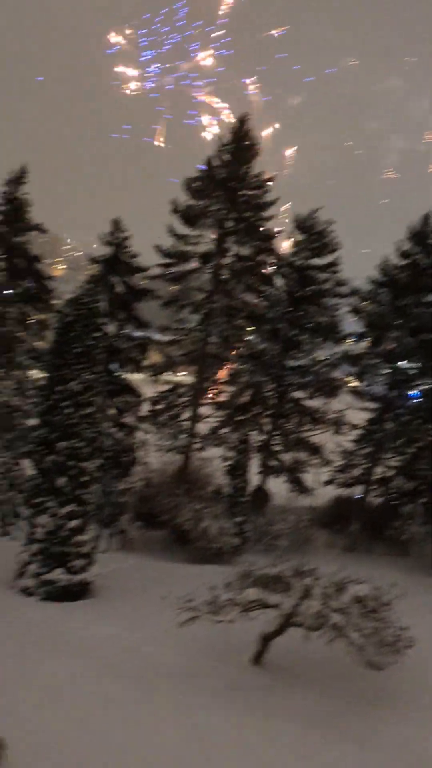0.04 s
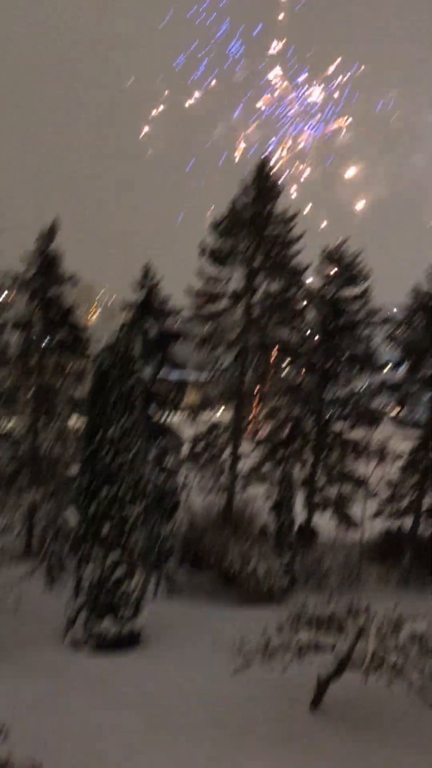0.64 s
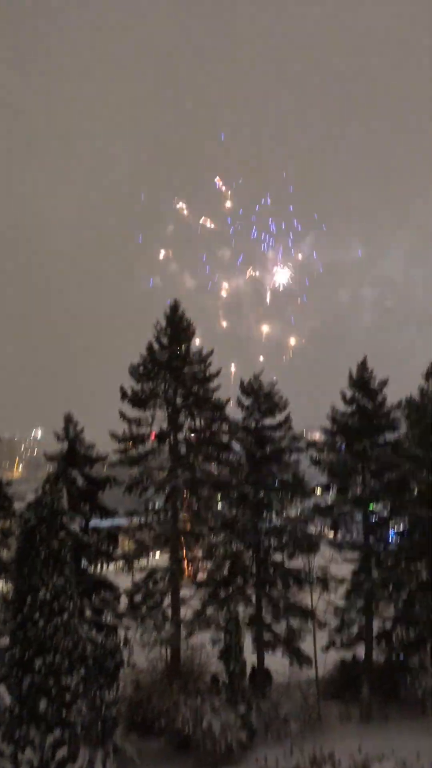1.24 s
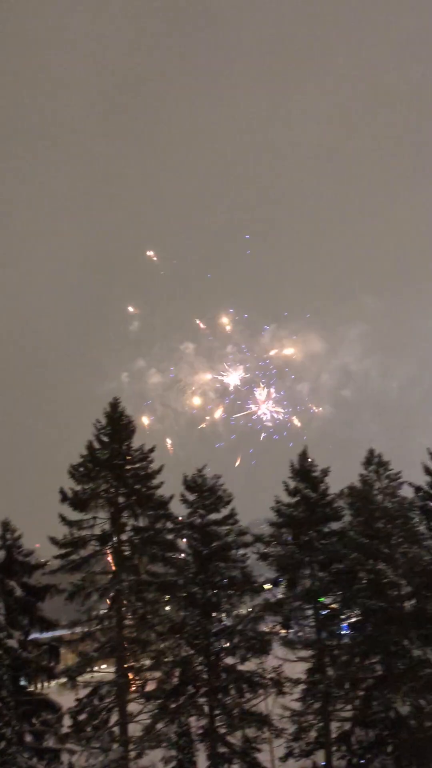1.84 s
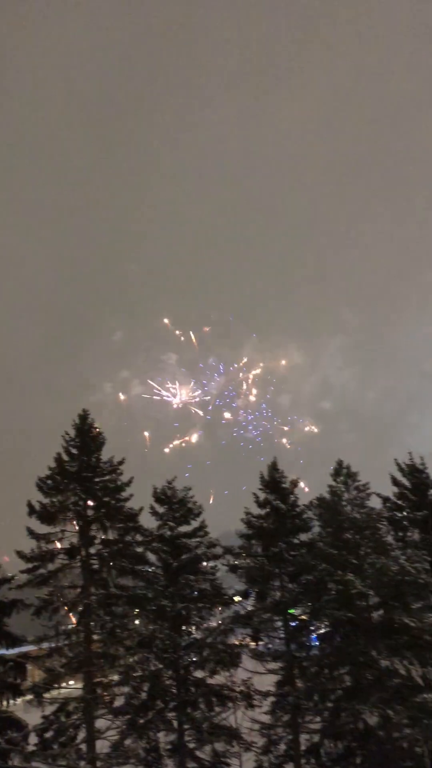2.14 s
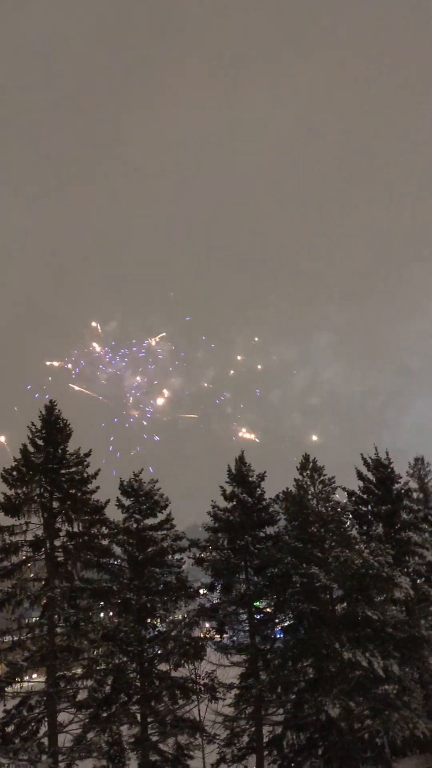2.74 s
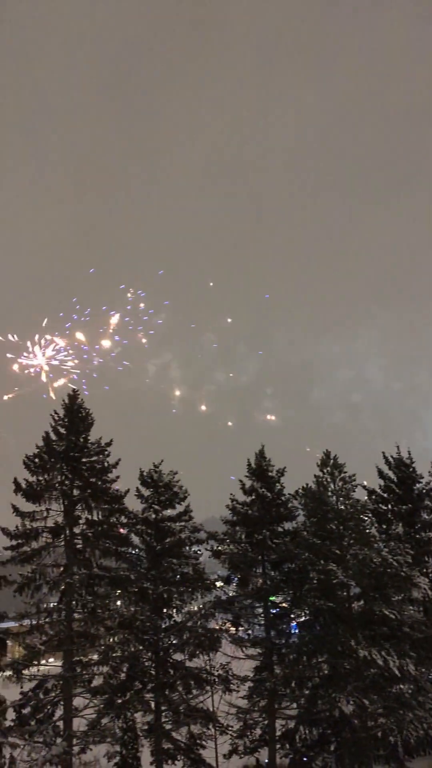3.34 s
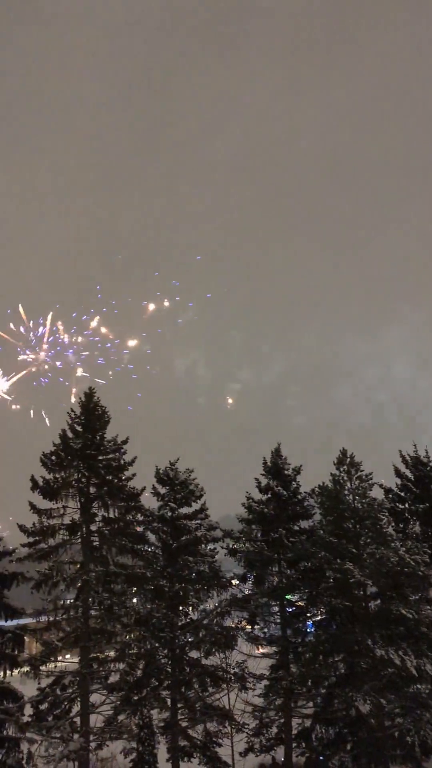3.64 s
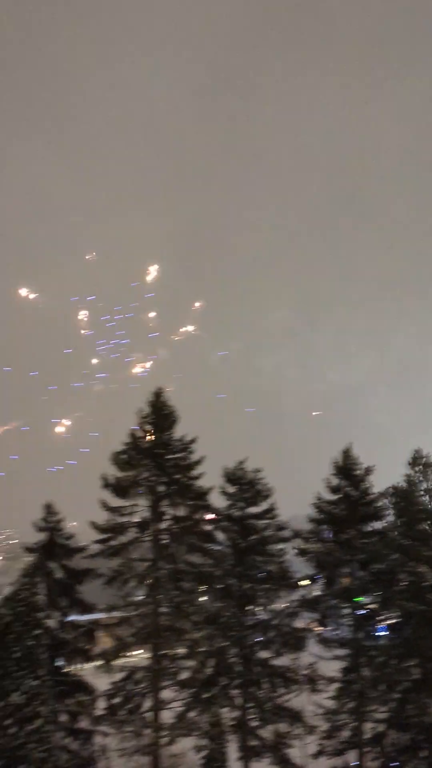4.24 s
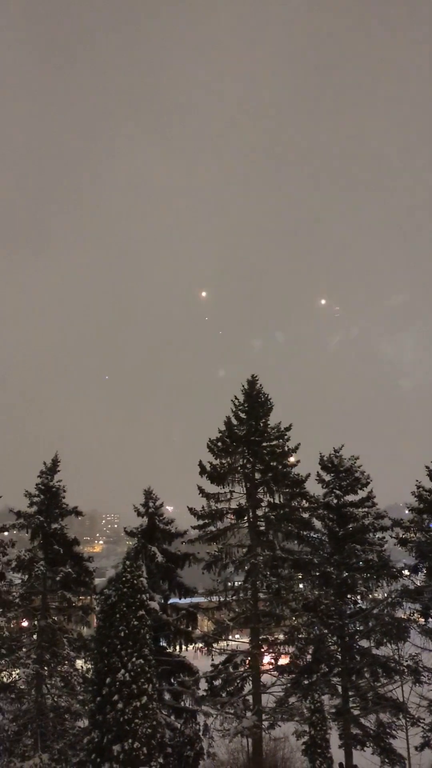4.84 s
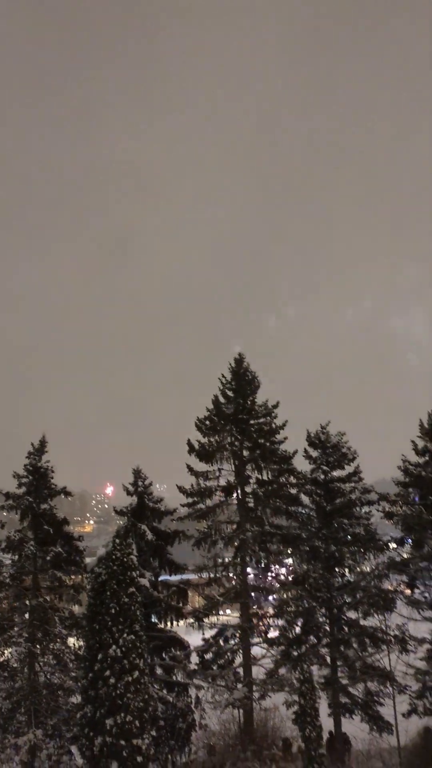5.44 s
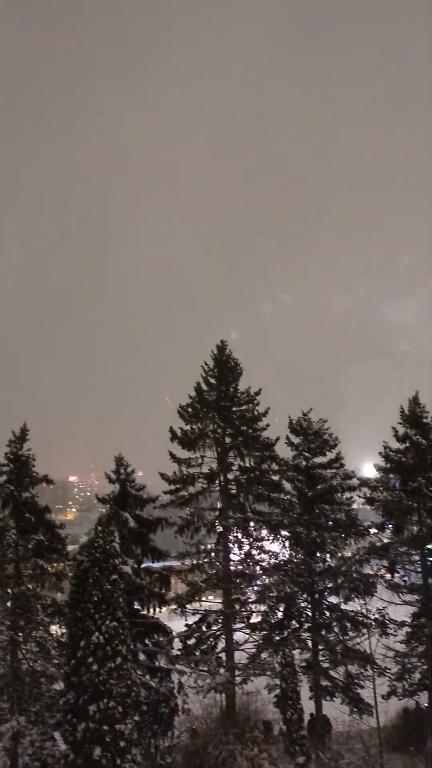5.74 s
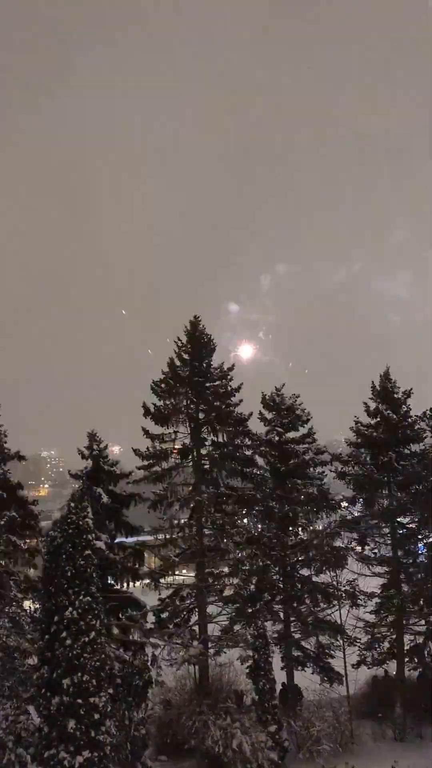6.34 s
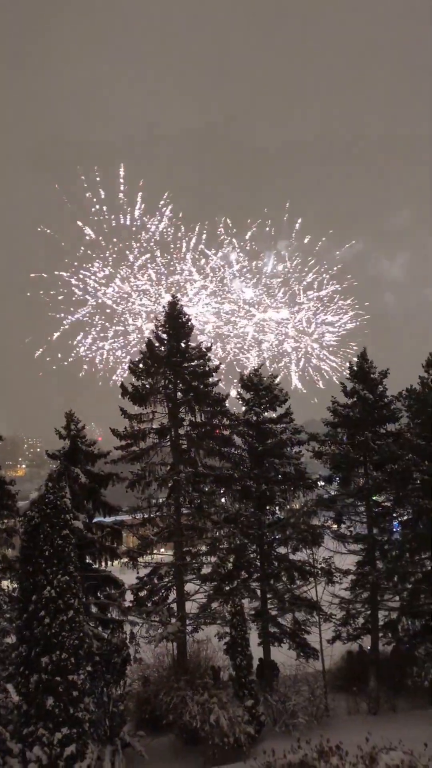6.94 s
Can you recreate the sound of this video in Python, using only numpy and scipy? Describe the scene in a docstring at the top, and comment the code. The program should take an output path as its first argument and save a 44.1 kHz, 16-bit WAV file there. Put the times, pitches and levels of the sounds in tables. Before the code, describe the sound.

Fireworks go off in a dense barrage, heard from a balcony over a town. Near shells thump and crack several times a second, each trailing a short hiss and an echo off houses, with small snaps and a constant distant rumble. Past the middle, duller, farther booms take over and a cloud of crackling swells. A tight salvo of close bangs ends it, the loudest hits briefly squashing the microphone.

```python
"""Fireworks barrage over a snowy town, heard from a balcony through a small limiting recorder.
Near shells thump and crack; branches scatter the crack into hiss, houses echo the thump.
Farther shells boom, dulled by air, and small charges snap over a constant roll of distant bursts.
Crackling stars come in clouds; the largest swells just before the last salvo."""
import sys
import numpy as np
from scipy import signal
from scipy.fft import rfft, irfft
from scipy.io import wavfile
from scipy.ndimage import uniform_filter1d, minimum_filter1d

SR = 44100
rng = np.random.default_rng(int(sys.argv[2]) if len(sys.argv) > 2 else 0)


def unload_audio(sound):
    """Save the sound as a 16-bit wav file, at the path given as the first command line argument."""
    columns = np.transpose(np.atleast_2d(sound))
    # keep every value between -1 and 1, then stretch to whole-number steps
    steps = np.round(np.clip(columns, -1, 1) * 32767)
    wavfile.write(sys.argv[1], SR, steps.astype(np.int16))


N = 317507
TIME = np.arange(N) / SR
THUMP_HZ = 194.4  # typical pitch
LEAD_SAMPLES = 1500  # silence ahead of a thump's front


def amp(db):
    """Decibels to gain."""
    return 10 ** (np.asarray(db) / 20)


def unit(x):
    """Scale to rms 1."""
    return x / np.sqrt(np.mean(x ** 2) + 1e-20)


def read(points, hz):
    """Interpolate a table over log frequency."""
    f, value = np.transpose(points)
    return np.interp(np.log(hz + 1), np.log(f + 1), value)


def add(mix, start_s, sound):
    """Mix a sound in; with a negative start it is already under way."""
    at = round(start_s * SR)
    sound = sound[..., max(-at, 0):]
    part = mix[:, max(at, 0):][:, :sound.shape[-1]]
    part += sound[..., :part.shape[1]]


def convolve(x, response):
    """Filter each channel with an impulse response."""
    return signal.fftconvolve(np.atleast_2d(x), np.atleast_2d(response), axes=1)[:, :N]


def pulse(spectrum, size=16384):
    """Minimum-phase pulse with this spectrum, peak 1."""
    log_gain = np.log(amp(read(spectrum, abs(np.fft.fftfreq(size, 1 / SR)))))
    wave = np.fft.ifft(np.exp(np.conj(signal.hilbert(log_gain)))).real[:size // 2]
    return wave / abs(wave).max()


def diffuse(pair, spectrum):
    """Colour two unrelated signals and make them alike in the bass, as at two close ports."""
    # (frequency [Hz], left-right correlation [0..1])
    coherence = [(25, 0), (65, 0.16), (130, 0.96), (300, 0.95), (640, 0.79), (1400, 0.37), (3000, 0),
                 (7000, 0)]
    size = pair.shape[1]
    hz = np.fft.rfftfreq(2 * size, 1 / SR)
    a, b = rfft(pair, 2 * size)
    turn = np.arcsin(np.clip(read(coherence, hz), 0, 1)) / 2
    ports = np.array([a * np.cos(turn) + b * np.sin(turn), b * np.cos(turn) + a * np.sin(turn)])
    return convolve(irfft(ports)[:, :size], pulse(spectrum))[:, :size]


def patter(per_s, spread_db, size=N):
    """Random stereo pressure kicks of unequal strength."""
    strength = amp(spread_db * np.minimum(rng.exponential(1, (2, size)), 4))
    return strength * rng.choice([-1, 1], (2, size)) * (rng.random((2, size)) < per_s / SR)


def lag(wave, hz, q):
    """All-pass: delay the band around hz."""
    poles = signal.iirnotch(hz, q, fs=SR)[1]
    return signal.lfilter(poles[::-1], poles, wave)


def lowpass(x, hz, order=4):
    """Butterworth treble cut."""
    return signal.sosfilt(signal.butter(order, hz, fs=SR, output="sos"), x)


def thump(hz, deep_hz=88, front_hz=800):
    """A bang as the small recorder colours it: a ringing thump whose bass lags and sweeps down."""
    # coloured bang: (frequency [Hz], level [dB])
    spectrum = [(20, -38), (50, -15.5), (85, -11.5), (125, -6), (190, 8), (255, -3.5), (330, -2),
                (520, -2.5), (700, -13.5), (1100, -12), (2000, -19.5), (3000, -38.5), (6000, -50),
                (16000, -62)]
    # (frequency [Hz], Q)
    delayed_bands = [(168, 0.76), (67.5, 2.17)]
    scale = hz / THUMP_HZ
    wave = np.pad(pulse([(f * scale, db) for f, db in spectrum]), (LEAD_SAMPLES, 0))
    for lag_hz, q in delayed_bands:
        wave = lag(wave, lag_hz * scale, q)
    deep, dull = (lowpass(wave, edge_hz, order=2) for edge_hz in (deep_hz, front_hz))
    body, front = dull - deep, wave - dull
    return [part / abs(part).max() for part in (deep, body, front)]


def rumble(deep, start_s, ground_db=-36, ground_s=0.028):
    """Deep bass also arrives over the ground and off walls: rough, and different on each side."""
    # deep bass relative to its blast: (time [s], level [dB])
    depth = [(0, -10), (2.85, -7), (3.5, -41), (6.6, -24), (7.05, -6)]
    t = TIME[:SR // 8]
    paths = rng.standard_normal((2, len(t))) * amp(ground_db) * np.exp(-t / ground_s)
    paths[:, 0] += 0.5  # direct path
    return amp(np.interp(start_s, *np.transpose(depth))) * convolve(paths, deep)


def crack(decay_s=0.00059, rattle_s=0.0053, rattle_width_s=0.00025, rattle_db=-9,
          tail_s=0.0075, tail_db=-12):
    """Ragged crack of a near shell, with a brief rattling buzz 5 ms later."""
    # (frequency [Hz], level [dB])
    spectrum = [(60, 10), (300, 9.5), (2000, -6), (6000, -15), (10000, -10.5), (12800, -5), (16000, -15.5)]
    t = TIME[:SR]
    rattle = amp(rattle_db) * np.exp(-abs(t - rattle_s) / rattle_width_s)
    envelope = np.exp(-t / decay_s) + rattle + amp(tail_db) * np.exp(-t / tail_s)
    return convolve(rng.standard_normal((2, SR)) * envelope, pulse(spectrum))


def branch_hiss():
    """Branches scatter a crack into a hiss whose top dies first."""
    # at onset: (frequency [Hz], level [dB])
    spectrum = [(500, -6), (2000, -0.5), (4000, -0.5), (7000, 1.5), (10000, 3), (12800, 11.5), (16000, -6)]
    # decay: (frequency [Hz], T60 [s])
    t60 = [(1000, 6.6), (4000, 1.1), (8000, 0.54), (13000, 0.25)]
    hz, age_s, bins = signal.stft(patter(per_s=4100, spread_db=2, size=SR), SR, nperseg=256)
    gain_db = read(spectrum, hz)[:, None] - 60 * age_s / read(t60, hz)[:, None]
    hiss = signal.istft(bins * amp(gain_db), SR, nperseg=256)[1]
    return hiss / hiss[:, :SR // 20].std()


def house_echo(rise_s=0.029, decay_s=0.15):
    """Houses return a thump as a swelling train of reflections."""
    # (frequency [Hz], level [dB])
    spectrum = [(25, -6), (50, -2), (80, -16), (130, 14), (300, -3.5), (1000, -6.5), (2200, -3),
                (4000, -11), (8000, -73), (16000, -40)]
    t = TIME[:SR]
    reflections = unit(diffuse(patter(per_s=1300, spread_db=2.5, size=SR), spectrum))
    return reflections * (1 - np.exp(-t / rise_s)) * np.exp(-t / decay_s)


def shells(pitch_spread=0.094, front_db=-3.5, hiss_db=-31, echo_db=-29.5):
    """Near shells: thump of slightly random pitch, shock front and crack, then hiss and echo."""
    # relative levels: (time [s], blast [dB], shock [dB], crack [dB])
    bursts = [(-0.06, -11, -6, 2), (0.0486, 3.5, -20, -4.5), (0.1645, 2, 0, 2), (0.6252, 3, -1, 4),
              (0.7255, 2.5, -5.5, -1.5), (0.8504, 2.5, -10, 0.5), (0.9123, 5, -2, 0),
              (1.4014, 2.5, -1, -0.5), (1.7524, 6.5, 7, 1), (1.8762, -2, 3, 1), (2.0322, 0.5, 4.5, -0.5),
              (2.3176, 4.5, 6, -1), (2.3624, 0, 1, 4.5), (2.5771, 1, 0, -6.5), (2.8477, -1.5, 4.5, 0),
              (2.9817, 2.5, 9, 1), (3.3228, 1.5, 3, -3.5), (3.3554, 0.5, -21, -1), (3.704, -1.5, -6, 1),
              (3.9353, 1, -13, 2), (4.0562, -2, -18, 2.5), (6.825, -4.5, 1.5, -9), (6.8846, 3.5, -2, 1),
              (6.899, -5, -8, -6), (6.9099, -6, -19, 4.5), (6.9243, -7, -19, -2), (6.9496, 0.5, -12, -1),
              (7.004, 0.5, 1, 4.5), (7.0406, -1.5, 1, -0.5), (7.121, 1, 11, -1)]
    # shock front: (frequency [Hz], level [dB])
    shock_spectrum = [(200, 3.5), (800, -1.5), (1900, 9), (3000, -4.5), (6000, -17), (12000, -9),
                      (16000, -61)]
    crack_sides_db, hiss_sides_db = np.array([[-7], [-1]]), np.array([[-1.5], [1.5]])
    shock = pulse(shock_spectrum)
    out = np.zeros((2, N))
    for s, blast_db, shock_db, crack_db in bursts:
        deep, body, front = thump(THUMP_HZ * np.exp(pitch_spread * rng.uniform(-1.33, 1)))
        add(out, s - LEAD_SAMPLES / SR, amp(blast_db) * (body + amp(front_db) * front))
        add(out, s - LEAD_SAMPLES / SR, amp(blast_db) * rumble(deep, s))
        add(out, s, amp(shock_db - 3) * shock)
        add(out, s, amp(crack_db + crack_sides_db) * crack())
        add(out, s, amp(0.5 * crack_db + hiss_db + hiss_sides_db) * branch_hiss())
        add(out, s, amp(1.34 * blast_db + echo_db) * house_echo())
    return out


def clumps(rms_db):
    """Gain wavering at 5-30 Hz: echoes arrive in clumps."""
    t = TIME[::128]
    waves = sum(np.sin(2 * np.pi * (hz * t + rng.random())) for hz in np.geomspace(5, 30, 24))
    return amp(rms_db * np.interp(TIME, t, unit(waves)))


def roll(far_trim_db=1.78, upper_trim_db=2, air_hz=4000):
    """Countless distant bursts and their echoes merge into a lumpy roar."""
    # (time [s], far level [dB], brighter layer level [dB])
    swells = [(0.0, -25, -37.5), (0.24, -20, -27), (0.58, -20, -33.5), (0.849, -21.5, -31),
              (1.051, -18.5, -27.5), (1.36, -18, -31), (1.48, -21.5, -30), (1.68, -18.5, -32),
              (1.9, -20, -29), (2.18, -18.5, -29), (2.4, -20, -29.5), (2.75, -21.5, -31), (3.1, -20.5, -29),
              (3.21, -20.5, -29.5), (3.301, -20, -35.5), (3.5, -22.5, -31.5), (3.66, -18, -32),
              (3.749, -23.5, -41), (3.89, -22.5, -34), (4.02, -23.5, -37.5), (4.31, -19.5, -29),
              (4.44, -21, -34), (4.78, -22.5, -34), (5.02, -23, -38), (5.16, -26, -39), (5.29, -20, -37.5),
              (5.5, -26.5, -35.5), (5.8, -24, -37.5), (6.8, -25.5, -37), (7.2, -16.5, -20.5)]
    # far bursts: (frequency [Hz], level [dB])
    dull = [(25, -85), (45, -32), (70, -12), (110, -9), (150, -7.5), (184, 1.5), (245, -4.5), (380, -3),
            (540, -6.5), (720, -15.5), (1200, -29), (3000, -68), (16000, -29)]
    # brighter layer: (frequency [Hz], level [dB])
    bright = [(300, -7.5), (700, 6), (1050, 8.5), (1500, 2), (2100, -4), (3000, -32.5), (5000, -28),
              (9000, -29), (13000, -25.5), (16000, -29)]
    s, far_db, upper_db = np.transpose(swells)
    lumps = clumps(rms_db=1)
    far = unit(diffuse(lumps ** 0.4 * patter(per_s=600, spread_db=3), dull))
    upper = unit(diffuse(lumps ** 1.36 * patter(per_s=4500, spread_db=3), bright))
    far = lowpass(far, air_hz) * amp(np.interp(TIME, s, far_db) + far_trim_db)
    return far + upper * amp(np.interp(TIME, s, upper_db) + upper_trim_db)


def stars(crisp_db=-6, fade_ratio=1.64, stray_db=-35, stray_db_per_s=-2.5):
    """Tiny pops of crackling stars, blurred by distance; clouds swell and die over fading strays."""
    # (peak time [s], level [dB], swell [s])
    clouds = [(3.09, -32.5, 0.035), (5.362, -31, 0.045), (5.645, -33.5, 0.041), (6.045, -22, 0.12),
              (6.365, -27.5, 0.011), (6.746, -32, 0.007)]
    # distant stars: (frequency [Hz], level [dB])
    pop_spectrum = [(300, 2), (900, 6.5), (2100, 5), (3000, -1), (5000, -13.5), (8000, -20), (12500, -24),
                    (16000, -28)]
    # nearest stars: (frequency [Hz], level [dB])
    crisp_spectrum = [(500, -4), (2000, 13), (3500, 6), (6500, -1.5), (9000, -14), (13000, -10),
                      (16000, -25)]
    pops = unit(diffuse(patter(per_s=3000, spread_db=2.5), pop_spectrum))
    crisp = unit(diffuse(patter(per_s=450, spread_db=4) * clumps(rms_db=2), crisp_spectrum))
    power = np.zeros(N)
    for s, db, swell_s in clouds:
        age = (TIME - s) / swell_s
        fade = 1 / np.cosh(np.clip(age / fade_ratio, 0, 20)) ** 2
        power += amp(db) ** 2 * np.where(age < 0, np.exp(-age ** 2), fade)
    stray_power = amp(stray_db + stray_db_per_s * TIME) ** 2
    # crispest where the cloud is thickest
    crisp_gain = amp(crisp_db) * np.sqrt(power.max()) * (power / power.max()) ** 0.95
    return (pops * np.sqrt(power + stray_power) + crisp * crisp_gain) * clumps(rms_db=1)


def booms(blast_trim_db=-1, front_db=-5, air_hz=1700, scatter_s=0.015, scatter_db=-35,
          knock_db=-9, knock_s=0.0039):
    """Farther shells: thumps dulled by air; close reflections roughen them and swell into a knock."""
    # relative levels: (time [s], blast [dB], hard front [dB], pitch [Hz])
    bursts = [(0.141, -12, -8, 218), (0.253, -9, -6.5, 174), (0.3068, -5, -34, 160),
              (0.4012, -12, -5.5, 224), (0.488, -5, -22, 167), (0.551, -10, -10.5, 208),
              (0.6, -7, -31, 208), (0.818, 1, 1, 204), (1.3583, -8, -6.5, 251), (1.5644, -0.5, -2.5, 209),
              (1.7091, -9, -20, 242), (1.8481, -11, -12, 220), (2.2076, 3, -8, 188),
              (2.521, -16.5, -12, 204), (2.6799, -7, -25, 185), (2.7994, -4, -9.5, 238),
              (2.961, -9.5, -16, 240), (3.1699, 7, -28, 209), (3.6502, -11, -29, 217),
              (3.88, -7.5, -18, 191), (3.912, -9, -25, 251), (4.151, -14, -9, 202),
              (4.3677, -7.5, -17, 170), (4.3867, 2.5, -2, 190), (4.508, -11.5, -21, 233),
              (4.587, 2.5, 0, 237), (4.8223, -1.5, -9.5, 198), (4.924, -6, -19, 192), (4.96, -12, -33, 249),
              (5.277, -8, -22, 256), (5.306, -7.5, -6, 212), (5.3371, -17, -4, 217),
              (5.5213, -12, -16, 234), (5.559, -5.5, -13, 255), (5.708, -0.5, -5.5, 219),
              (5.828, 5, 2.5, 223), (5.9023, -7, -20, 196), (6.156, -11.5, -31, 203),
              (6.2997, -6.5, -5, 213), (6.5548, -10, -38, 202), (6.6673, -8.5, -10, 205),
              (7.1866, -5.5, -12, 208)]
    # (frequency [Hz], level [dB])
    knock_spectrum = [(120, -23), (300, -25), (500, 8.5), (800, -5), (1300, -8), (2000, -15), (3200, -35),
                      (8000, -57)]
    out, t = np.zeros((2, N)), TIME[:SR // 10]
    for s, blast_db, hard_db, hz in bursts:
        deep, body, front = thump(hz, front_hz=610)
        paths = diffuse(rng.standard_normal((2, len(t))), [(100, 3.0), (3000, -2.5)])
        paths *= amp(scatter_db) * np.exp(-t / scatter_s)
        paths[:, 0] += 1  # direct path
        gain = amp(blast_db + blast_trim_db)
        wave = gain * body + amp(hard_db + front_db) * lowpass(front, air_hz)
        add(out, s - LEAD_SAMPLES / SR, gain * rumble(deep, s))
        add(out, s - LEAD_SAMPLES / SR, convolve(paths, wave))
        knock = unit(diffuse(rng.standard_normal((2, len(t))), knock_spectrum))
        add(out, s, amp(hard_db + knock_db) * knock * t / knock_s * np.exp(1 - t / knock_s))
    return out


def snaps(spike_db=3, bounce_s=0.00099, bounce_db=-2, burst_db=-11, burst_s=0.005,
          tail_db=-12, tail_s=0.035, ring_hz=2230, ring_db=-14, ring_s=0.013):
    """Small charges: a hard spike and its bounce, a ragged burst, a hollow ring and a faint tail."""
    # (time [s], level [dB])
    reports = [(0.402, -17.5), (0.552, -12), (0.9816, -12.5), (1.276, -15), (1.463, -16), (1.649, -16),
               (1.8497, -24), (2.2678, -17), (5.3068, -16), (5.3256, -12), (5.3393, -18), (6.358, -29)]
    # (frequency [Hz], level [dB])
    spectrum = [(200, -4), (700, 17), (2000, 9.5), (3500, 5), (7000, -1.5), (13000, -10.5), (16000, -20)]
    out, t = np.zeros((2, N)), TIME[:SR // 4]
    spike = amp(spike_db) * lag(pulse(spectrum), hz=1020, q=1.0)
    envelope = np.exp(-t / burst_s) + amp(tail_db) * np.exp(-t / tail_s)
    for s, db in reports:
        noise = unit(diffuse(rng.standard_normal((2, len(t))), spectrum))
        resonator = signal.iirpeak(ring_hz * rng.uniform(0.96, 1.04), Q=18, fs=SR)
        ring = unit(signal.lfilter(*resonator, noise))
        add(out, s, amp(db) * spike)
        add(out, s + bounce_s, -amp(db + bounce_db) * spike)
        add(out, s, amp(db + burst_db) * noise * envelope)
        add(out, s, amp(db + ring_db) * ring * np.exp(-t / ring_s))
    return out


def scene():
    """Near shells, far booms and snaps over the distant roll and crackle."""
    distant = lowpass(roll() + stars(), hz=15000)
    return shells() + booms() + snaps() + distant


def record(dry, threshold_db=-4.0, crack_sense=0.56, recover_db_per_s=130, low_hz=37, high_hz=16100):
    """A look-ahead limiter ducks everything at each near bang; sharp peaks clip; then band limits."""
    smoothed = uniform_filter1d(dry.mean(0), size=15)
    level = np.maximum(abs(smoothed), crack_sense * abs(dry).max(0))  # brief cracks only partly sensed
    over_db = np.maximum(20 * np.log10(level + 1e-9) - threshold_db, 0)
    recovery_db = TIME * recover_db_per_s
    held_db = np.maximum.accumulate(over_db + recovery_db) - recovery_db
    gain_db = uniform_filter1d(minimum_filter1d(-held_db, size=257), size=257)
    limited = np.clip(dry * amp(gain_db), -0.93, 0.93)
    bass_cut = signal.butter(6, low_hz, "high", fs=SR, output="sos")
    treble_cut = signal.firwin(201, high_hz, window=("kaiser", 8), fs=SR)
    return signal.oaconvolve(signal.sosfilt(bass_cut, limited), treble_cut[None], "same")


dry = scene()
out = record(dry)
unload_audio(out)
```